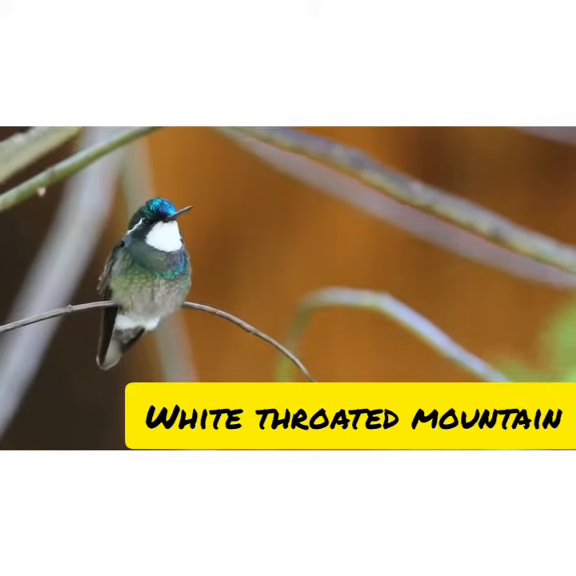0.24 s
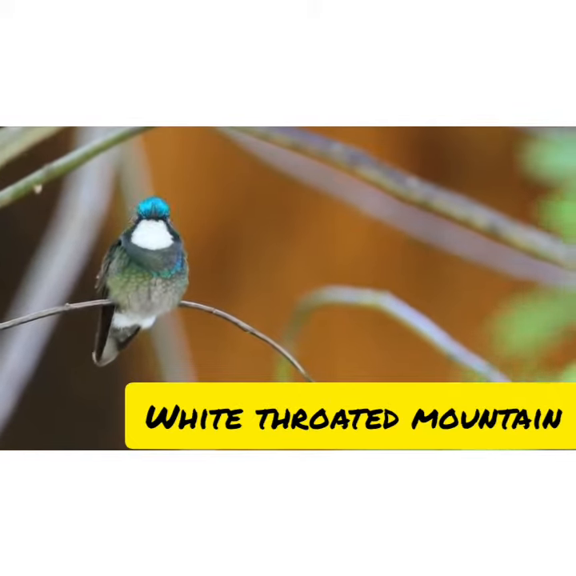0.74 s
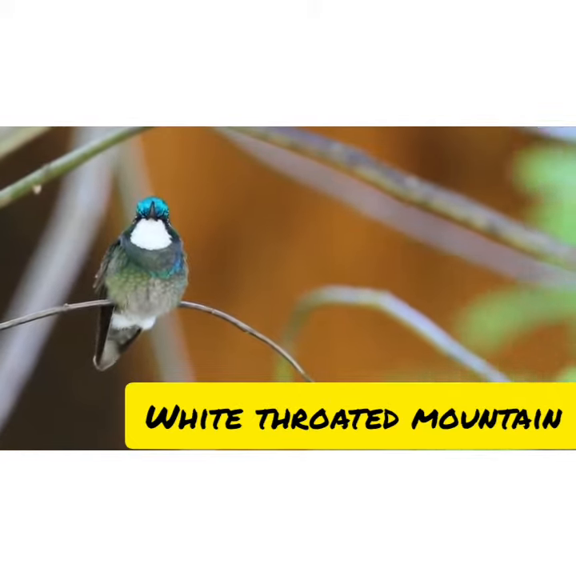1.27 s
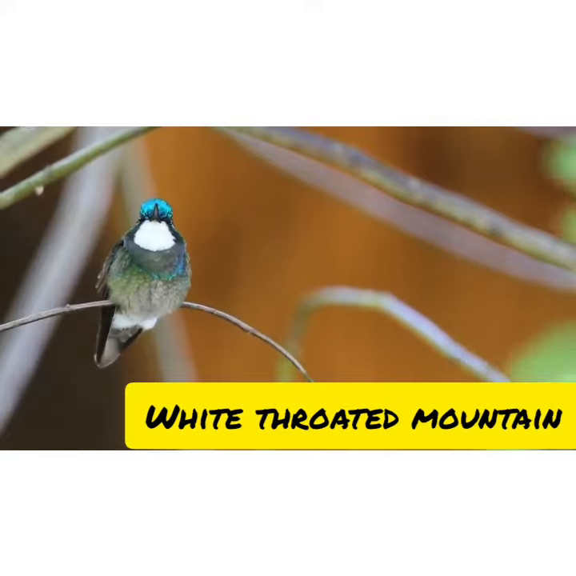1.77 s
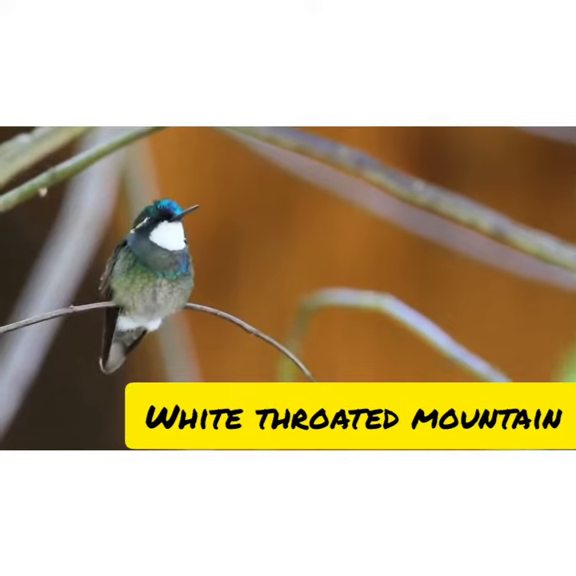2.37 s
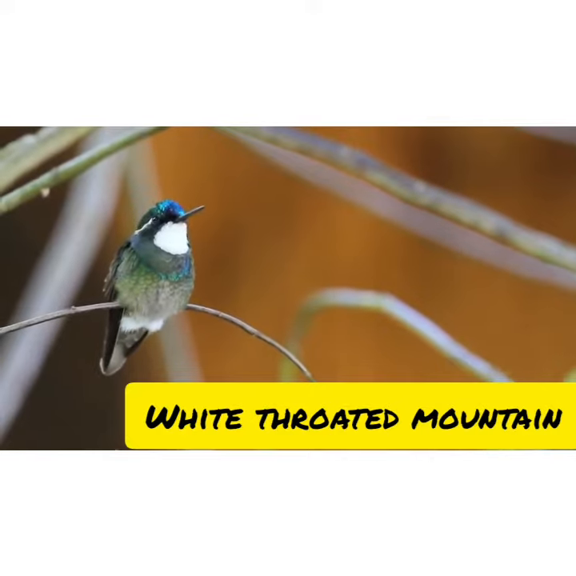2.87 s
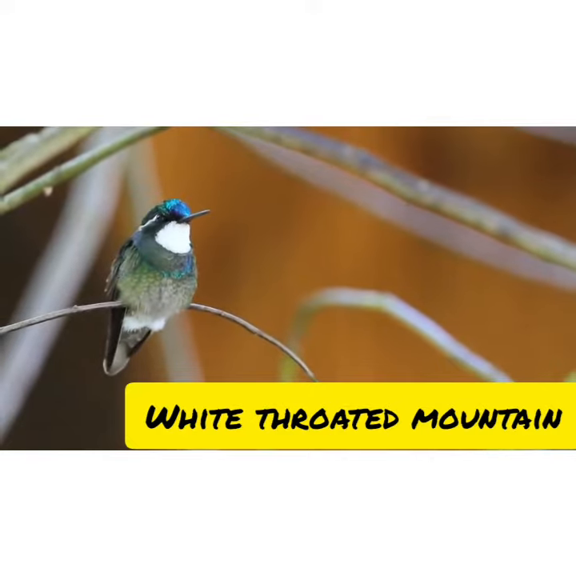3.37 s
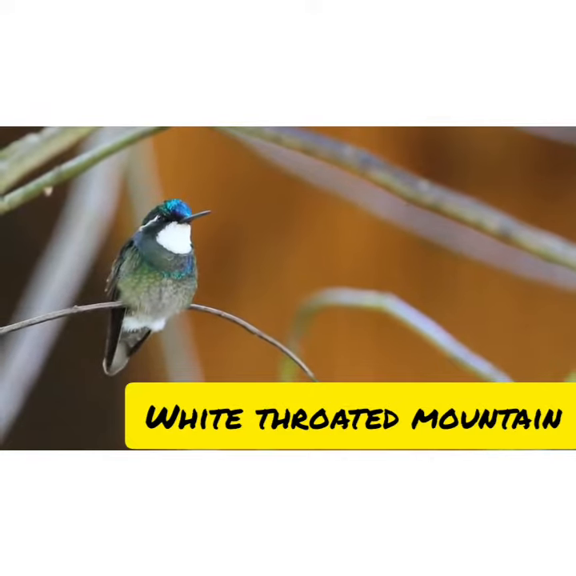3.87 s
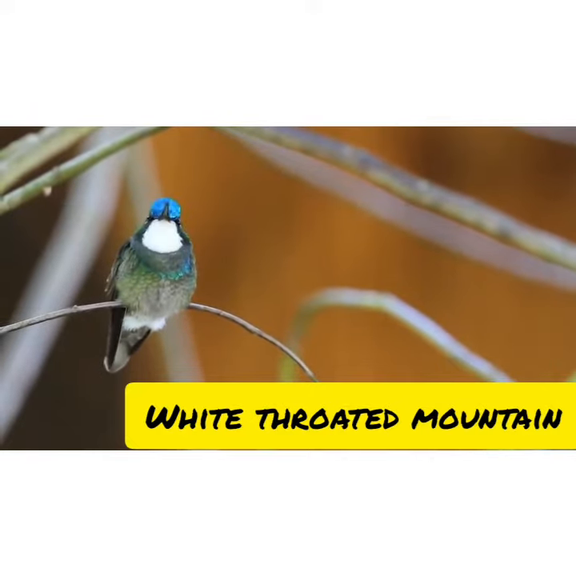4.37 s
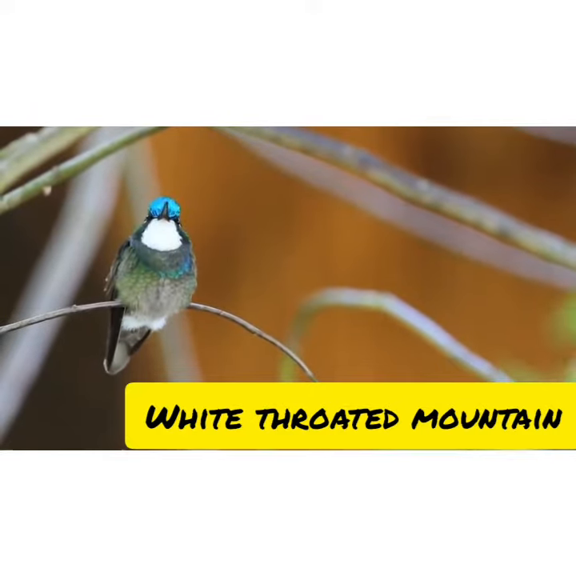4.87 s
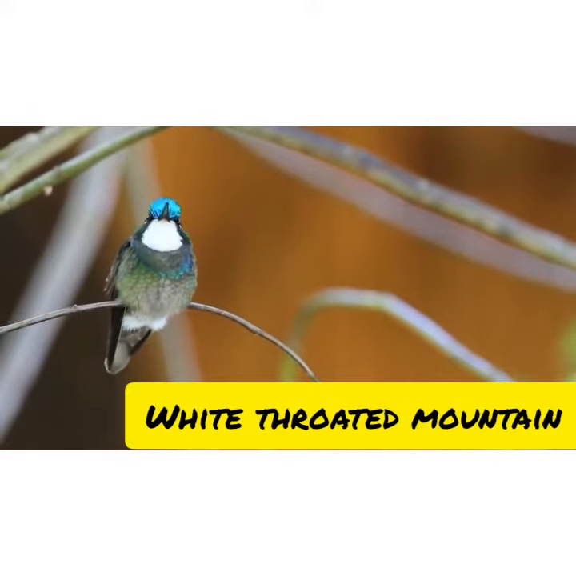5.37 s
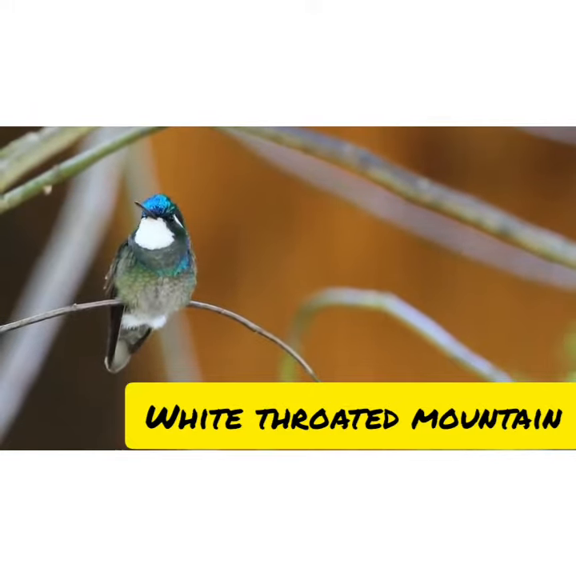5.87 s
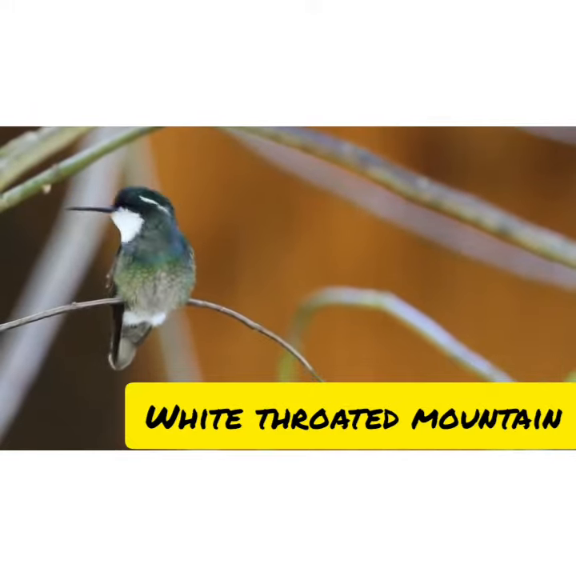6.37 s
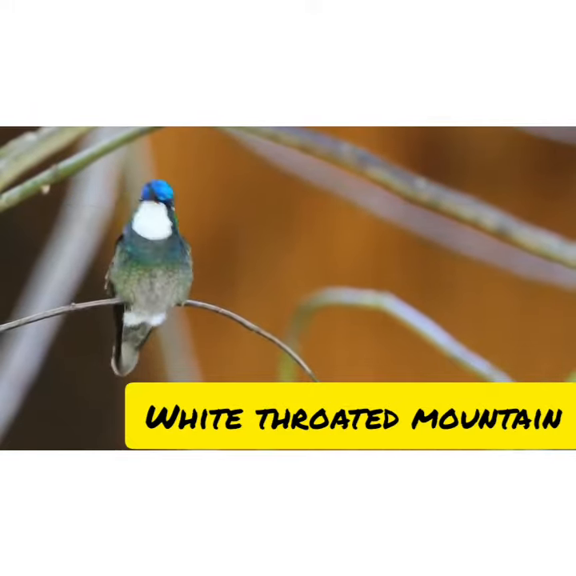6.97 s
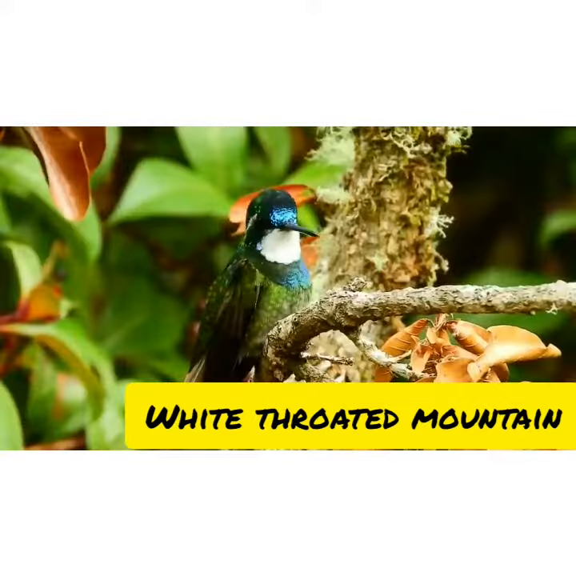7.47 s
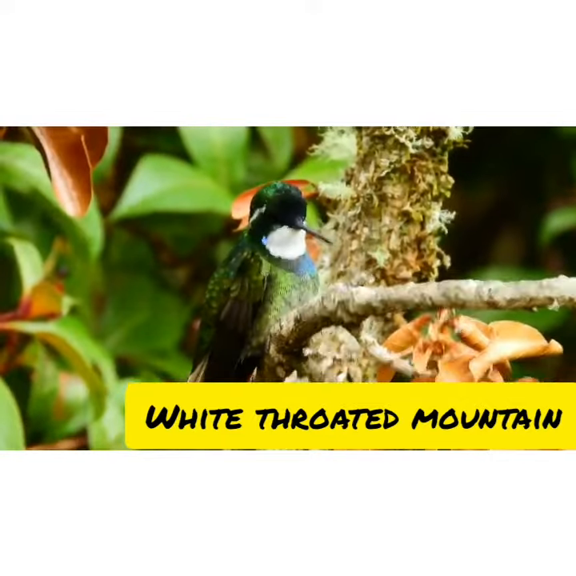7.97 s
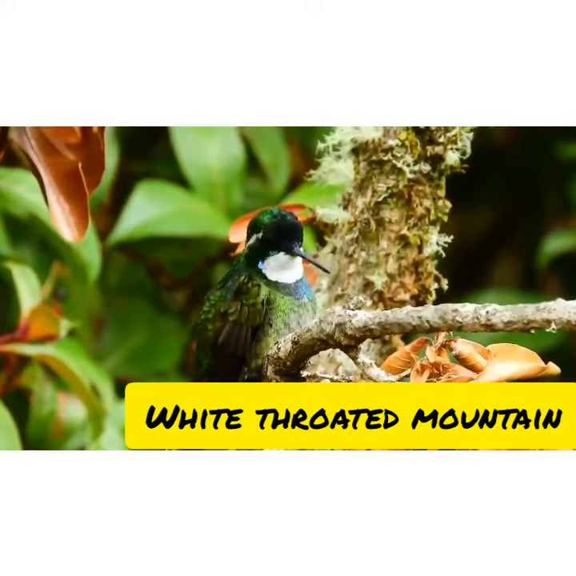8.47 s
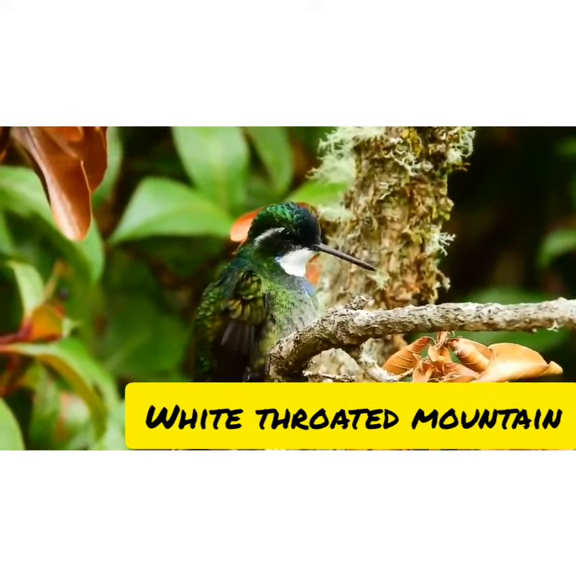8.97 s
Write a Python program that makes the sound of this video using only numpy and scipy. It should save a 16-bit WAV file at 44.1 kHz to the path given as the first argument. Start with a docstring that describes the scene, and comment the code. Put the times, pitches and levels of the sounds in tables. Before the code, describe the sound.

High bird whistles swoop downward among quick bright chirps and chatter in an airy forest; sound cuts briefly, then sparse chirps and ticks continue.

```python
"""Mountain forest with birds, over the hiss of distant water; the sound drops out briefly and resumes at another spot.
Two songbirds whistle long falling slides, a hummingbird near by repeats two quick chirps; others chatter,
squawk, buzz and peep. Voices are gliding sines, some with overtones; water, hum and ticks are filtered noise.
Noise trails echo the voices off leaves and trunks; both channels are alike."""
import sys
import numpy as np
from scipy import signal
from scipy.fft import rfft, irfft
from scipy.io import wavfile
from scipy.ndimage import uniform_filter1d, map_coordinates

SR = 44100
rng = np.random.default_rng(int(sys.argv[2]) if len(sys.argv) > 2 else 0)


def unload_audio(sound):
    """Save the sound as a 16-bit wav file, at the path given as the first command line argument."""
    columns = np.transpose(np.atleast_2d(sound))
    # keep every value between -1 and 1, then stretch to whole-number steps
    steps = np.round(np.clip(columns, -1, 1) * 32767)
    wavfile.write(sys.argv[1], SR, steps.astype(np.int16))


N = 406602   # samples
CHANGE_S = 7.2   # first spot before, second spot after


def from_db(db):
    """Gain of a level in dB."""
    return 10 ** (np.asarray(db) / 20)


def flutter(rate_hz):
    """Smooth chance of spread about one: random knots at rate_hz joined by a cubic spline."""
    knots = int(N / SR * rate_hz)
    return map_coordinates(rng.standard_normal(knots), [np.linspace(0, knots - 1, N)], order=3)


def sing(notes, overtones_db, edge_s=0.0011, round_s=0.001, waver=0.0022, waver_hz=150,
         throat_hz=20000, fickle_db=0.0):
    """Gliding sines with rounded bends, unsteady pitch, overtones that may come and go, and soft edges."""
    out = np.zeros(N)
    unsteady = 1 + waver * flutter(waver_hz)
    overtone_gains = [from_db(db + fickle_db * flutter(59.78)) for db in overtones_db]
    for note in notes:
        point_s, point_hz, point_db = np.transpose(note)
        start_s, end_s = point_s[0], point_s[-1]
        at = np.arange(max(int(start_s * SR), 0), min(int(end_s * SR), N))
        t_s = at / SR
        glide_hz = np.interp(t_s, point_s, point_hz)
        pitch_hz = uniform_filter1d(glide_hz, int(round_s * SR) + 1, mode="nearest") * unsteady[at]
        phase = 2 * np.pi * (np.cumsum(pitch_hz) / SR + rng.random())
        tone = np.sin(phase)
        for k, gain in enumerate(overtone_gains, start=2):
            throat = 1 / (1 + (k * pitch_hz / throat_hz) ** 8)   # mutes the highest overtones
            below_nyquist = k * pitch_hz < SR / 2
            tone += gain[at] * np.sin(k * phase) * throat * below_nyquist
        edges = np.clip(np.minimum(t_s - start_s, end_s - t_s) / edge_s, 0, 1)
        out[at] += np.sqrt(2) * from_db(np.interp(t_s, point_s, point_db)) * edges * tone
    return out


def repeat(shape, events):
    """The same strokes at every event, the pitch a shade different each time."""
    detune = 1 + 0.0054 * rng.standard_normal(len(events))
    notes = []
    for (start_s, level_db), ratio in zip(events, detune):
        for stroke in shape:
            notes.append([(start_s + s, hz * ratio, db + level_db) for s, hz, db in stroke])
    return notes


# Note shapes. Each row: share of the note's length, share of the way from first to last pitch, level in dB.
STEP_DOWN = [(0, .02, -37), (.33, -.14, -9), (.6, -.3, -2), (.7, -0.092, 1.5), (.84, .87, 1.5),
             (1, 1, -3.5)]
HOLD_AND_DROP = [(0, -0.038, -32), (.07, .1, -13.5), (.19, .01, 2), (.39, .11, -3.5), (.5, .1, -27),
                 (.6, .33, -21), (.74, .53, 2.5), (.9, .95, -2.5), (1, 0.99, -12.5)]
HIGH_SLIDE = [(0, 0.038, -43), (.024, .19, -17.5), (.09, 0.37, -5), (.165, 0.57, 4.5), (.235, .675, -0.5),
              (.32, 0.715, -3), (.49, .76, -2), (.645, .865, 4.5), (1, 1, -15)]
SHELF_SLIDE = [(0, 0, -18), (.065, .17, -0.5), (.14, 0.29, -1.5), (.29, 0.28, -4), (.34, 0.31, -6.5),
               (.41, 0.506, -1), (.83, 0.877, 2), (1, 1.01, -14)]
STEEP_SLIDE = [(0, 0.086, -33), (.077, .39, 1), (.167, .567, 0), (.45, .785, 1.5), (.77, 0.95, 4.5),
               (1, 1, -1)]
FALL = [(0, 0.0069, -7), (.1, 0.18, -0.5), (.28, 0.57, 0.3), (.6, .87, 1), (1, 0.99, -6)]
SHORT_CAP = [(0, 0.023, -23), (.3, .2, -20), (.42, 0.283, -10.5), (.72, 0.476, 3), (.79, 0.69, -10),
             (1, 1, -25)]
LONG_SLIDE = [(0, 0.0049, -27.5), (.15, .1, -5.5), (.2, .17, 1), (.35, .5, 4), (.55, .72, -1),
              (.76, .87, -6.5), (1, 1, -21.5)]
STEPPED_FALL = [(0, 0.067, -13), (.1, 0.011, -5), (.32, .32, 3), (.5, 0.36, 2), (.76, .95, 0), (1, 1, -4)]
SNAP_FALL = [(0, 0.022, -14), (.08, 0.11, -15), (.11, 0.24, 6), (.15, 0.26, -11.5), (.45, .75, -10),
             (1, 1, -15.5)]
SWELL = [(0, 0.011, -10), (.48, 0.5, 4), (1, 1, -6)]
GLIDE = [(0, 0.065, 0.5), (1, 0.97, 3.5)]
SCOOP_HOLD_FLICK = [(0, -.6, -13), (.13, .12, 3.5), (.3, 0.12, 5), (.45, 0.04, 2), (.8, .02, 3),
                    (1, 1, 2.5)]
KICKED_HOLD = [(0, -.4, -12), (.17, .06, 3), (.27, .3, 0), (.36, 0, -0.5), (.8, 0, 2), (1, 0.9, -6)]
LATE_KICK = [(0, -.3, -5.5), (.5, 0.091, 1.5), (.57, .45, -1), (.65, 0, -2), (.83, .03, 1), (1, 1, 3)]
WARBLED_FALL = [(0, 0.058, -6.5), (.13, 0.098, -6), (.24, .42, 5), (.33, 0.29, 3), (.43, .56, 2),
                (.57, 0.61, 4), (1, 0.97, -7)]
ARCH = [(0, 0.0084, -12), (.2, -.3, 0), (.42, -.65, -0.5), (.65, -.2, -1), (1, 1, -7)]
UPSWING = [(0, 0.046, -6), (.65, 0.4, 3), (1, 1, -4)]
HUMPED_NOTE = [(0, -.6, -8.5), (.14, 1.05, 3), (.42, 0.86, 2.5), (.52, .25, 2.5), (.7, -.03, 0),
               (.89, 0.028, 0), (1, 1.07, -7)]


def lay_out(song):
    """Stretch each shape to its notes' length and pitch range: (s, Hz, dB) points.

    Each song row: shape, notes. Each note: start in s, length in s, first Hz, last Hz, level in dB."""
    laid = []
    for shape, notes in song:
        for start_s, length_s, first_hz, last_hz, level_db in notes:
            laid.append(sorted((start_s + length_s * share, first_hz + (last_hz - first_hz) * way, db + level_db)
                               for share, way, db in shape))
    return laid


def forest(x, near_db, near_t60, far_db, far_t60=0.51):
    """Direct sound plus scatter off near leaves and far trunks: two dying noises, T60 in seconds."""
    t_s = np.arange(SR) / SR
    trail = np.zeros(SR)
    for db, t60_s in ((near_db, near_t60), (far_db, far_t60)):
        echoes = rng.standard_normal(SR) * from_db(-60 * t_s / t60_s)
        trail += from_db(db) * echoes / np.sqrt(np.sum(echoes ** 2))
    trail[0] = 1   # direct sound
    before = np.arange(N) < CHANGE_S * SR
    first = signal.fftconvolve(x * before, trail)[:N] * before   # echoes end with the first spot
    second = signal.fftconvolve(x * ~before, trail)[:N]
    return first + second


# Water colour. Each row: frequency in Hz, relative density in dB at the first spot, at the second spot.
HISS_COLOURS = [(30, -27, -27), (90, -40.5, -37), (218, -37, -33), (291.5, -23.5, -25.5), (471.4, -1, -1.5),
                (600, -5.5, -2.5), (1175, -7.5, -2), (2300, -16, -8.5), (4400, -19, -17.5),
                (8040, -23, -24.5), (15300, -27.5, -29)]
FIRST_HISS_DB, SECOND_HISS_DB = -44, -51.5   # RMS before swell and drop-out gain


def water_hiss():
    """Far water: smooth noise, coloured differently at the two spots, swelling a little."""
    knot_hz, first_db, second_db = np.transpose(HISS_COLOURS)
    bins_hz = np.maximum(np.fft.rfftfreq(N, 1 / SR), 1)
    white = rfft(rng.standard_normal(N))

    def colour(density_db):
        return irfft(white * from_db(np.interp(np.log(bins_hz), np.log(knot_hz), density_db)), N)

    first, second = colour(first_db), colour(second_db)
    both = np.where(np.arange(N) < CHANGE_S * SR,
                    from_db(FIRST_HISS_DB) * first / first.std(),
                    from_db(SECOND_HISS_DB) * second / second.std())
    swell = np.interp(np.arange(N), np.linspace(0, N, 40), rng.standard_normal(40))
    return both * from_db(0.33 * swell)


HUM_S, HUM_HZ, HUM_DB = 6.54, 478, -44   # dB: RMS before swell and drop-out gain


def low_hum():
    """A soft, narrow rush of low noise that swells once, briefly."""
    band = signal.butter(2, [0.88 * HUM_HZ, HUM_HZ / 0.91], "band", fs=SR, output="sos")
    rush = signal.sosfilt(band, rng.standard_normal(N))
    swell = np.exp(-((np.arange(N) / SR - HUM_S) / 0.082) ** 2)
    return from_db(HUM_DB) * rush / rush.std() * swell


# Faint, nearly level held notes at several pitches, far off. Song rows as in lay_out.
STEADY_NOTES = [(SWELL, [(5.41, .2, 2505, 2490, -48), (5.545, .12, 2860, 2870, -55),
                (5.585, .09, 2150, 2140, -54), (5.76, .14, 2870, 2830, -57),
                (5.82, 0.085, 2100, 2100, -55.5)])]


def steady_notes():
    """A far bird's held notes: plain sines."""
    return sing(lay_out(STEADY_NOTES), [])


# Short thin falls and peeps, far off. Song rows as in lay_out.
THIN_NOTES = [(FALL, [(1.403, 0.036, 11600, 7830, -31)]), (SWELL, [(5.491, 0.027, 10650, 6850, -27),
              (1.843, 0.018, 6950, 6930, -39), (1.843, 0.017, 8250, 8650, -48)]),
              (GLIDE, [(5.493, 0.021, 11800, 8920, -41)]), (SNAP_FALL, [(7.23, 0.031, 6210, 3630, -26.5)])]


def thin_notes():
    """Short, high plain sines."""
    return sing(lay_out(THIN_NOTES), [], edge_s=0.0013)


# Far chatter strokes. Each row: seconds from start, pitch in Hz, level in dB.
FAR_CHATTER_SHAPE = [
    [(0, 3180, 5.5), (.018, 2620, 2), (.048, 2890, 0)],
]
# Each row: start in seconds, level in dB.
FAR_CHATTER_EVENTS = [(0, -50.5), (.152, -54), (.268, -54.5), (0.377, -52), (.495, -54)]


def far_chatter():
    """Chatter from far off: wavering sines without overtones."""
    return sing(repeat(FAR_CHATTER_SHAPE, FAR_CHATTER_EVENTS), [], waver=0.022)


# Soft low whistles. Song rows as in lay_out.
WHISTLE_NOTES = [(HUMPED_NOTE, [(3.018, 0.069, 2420, 3530, -38)]),
                 (SCOOP_HOLD_FLICK, [(3.17, .048, 2220, 2650, -43)]),
                 (WARBLED_FALL, [(3.4, 0.064, 4760, 2760, -36)]),
                 (STEPPED_FALL, [(6.45, .13, 3990, 2500, -40.5)]), (FALL, [(6.822, 0.056, 2200, 3080, -50),
                 (.643, .035, 3250, 2150, -55)])]


def whistles():
    """Wavering sines with a weak second harmonic."""
    return sing(lay_out(WHISTLE_NOTES), [-23], round_s=0.003, waver=0.014, throat_hz=7860)


# Harsh buzzes. Song rows as in lay_out.
BUZZ_NOTES = [(GLIDE, [(1.322, .063, 751, 1270, -42.5), (1.515, 0.037, 855, 880, -45.5)]),
              (UPSWING, [(3.382, .019, 893, 2060, -43)])]
# Overtones 2, 3, ..: mean level in dB against the fundamental, before throat and high-pass.
BUZZ_OVERTONES_DB = [2, -0.5, -1, 0.5, -5, -6, -7]


def buzzes():
    """Low, rough pitch with strong overtones; a small throat sends out little bass."""
    voice = sing(lay_out(BUZZ_NOTES), BUZZ_OVERTONES_DB, waver=0.025, waver_hz=401,
                 throat_hz=7500, fickle_db=1.5)
    return signal.sosfilt(signal.butter(2, 950.0, "high", fs=SR, output="sos"), voice)


# Squawk strokes, arched in pitch. Each row: seconds from start, pitch in Hz, level in dB.
SQUAWK_SHAPE = [
    [(0, 1870, -16), (.007, 1273, 5), (.017, 1355, 2), (.026, 1250, -2), (.038, 837, -2)],
]
# Each row: start in seconds, level of the weak fundamental in dB.
SQUAWK_EVENTS = [(1.866, -60), (2.407, -62.5)]
# Squawks that start low and arch over. Song rows as in lay_out, level of the weak fundamental.
ARCHED_SQUAWKS = [(ARCH, [(1.62, .037, 1127, 807, -59), (2.709, .029, 1293, 986, -76.5)])]
# Overtones 2, 3, ..: mean level in dB against the fundamental, before the throat.
SQUAWK_OVERTONES_DB = [4, 26.5, 30.5, 20.5, 24.8, 18.3]


def squawks():
    """A weak fundamental under much stronger overtones, rough in pitch."""
    return sing(repeat(SQUAWK_SHAPE, SQUAWK_EVENTS) + lay_out(ARCHED_SQUAWKS), SQUAWK_OVERTONES_DB,
                round_s=0.0036, waver=0.013, waver_hz=400, fickle_db=2.5)


# High peep stroke. Each row: seconds from start, pitch in Hz, level in dB.
PEEP_SHAPE = [
    [(.004, 10050, -23), (.013, 8650, 0.5), (.017, 9300, 2.5), (.024, 9300, -20)],
]
# Each row: start in seconds, level in dB.
PEEP_EVENTS = [(7.556, -44), (7.9597, -32), (8.606, -39.5), (9.1757, -36.5)]


def peeps():
    """High plain sines: pitch dips, then rises."""
    return sing(repeat(PEEP_SHAPE, PEEP_EVENTS), [])


# Dry ticks. Each row: start in seconds, burst level in dB before the band-pass.
TICK_EVENTS = [(8.2337, -35), (8.2358, -37), (8.238, -35), (8.2883, -34), (8.3243, -41), (8.73, -38.5)]


def ticks():
    """Tiny bursts of bright noise, about a millisecond long."""
    clicks = np.zeros(N)
    decay = np.exp(-np.arange(200) / (0.00078 * SR))
    for start_s, level_db in TICK_EVENTS:
        at = int(start_s * SR)
        clicks[at:at + 200] += from_db(level_db) * rng.standard_normal(200) * decay
    return signal.sosfilt(signal.butter(2, [6000, 13000], "band", fs=SR, output="sos"), clicks)


# Chattering bird. Song rows as in lay_out.
CHATTER_NOTES = [(HUMPED_NOTE, [(1.068, 0.084, 2556, 3400, -35.5)]),
                 (SCOOP_HOLD_FLICK, [(1.188, 0.065, 2646, 3590, -37), (1.296, .064, 2606, 3370, -36),
                 (1.66, 0.066, 2616, 3620, -37.5)]), (LATE_KICK, [(1.418, .077, 2694, 3590, -32)]),
                 (KICKED_HOLD, [(1.538, 0.076, 2637, 3760, -34.5)])]
# Overtones 2, 3, ..: mean level in dB against the fundamental, before the throat.
CHATTER_OVERTONES_DB = [-11.5, 1.7, -4]


def chatter():
    """Rough pitch, rich in overtones that come and go."""
    return sing(lay_out(CHATTER_NOTES), CHATTER_OVERTONES_DB, round_s=0.003, waver=0.017, waver_hz=300.2,
                throat_hz=8280, fickle_db=3.0)


# Hummingbird chirps, stroke by stroke. Each row: seconds from start, pitch in Hz, level in dB.
RISING_SHAPE = [
    [(.004, 8800, -15), (.0058, 6260, -2), (.007, 4300, -17)],
    [(.008, 5700, -18), (.0095, 5030, -4), (.013, 4780, -22)],
    [(.0185, 7500, -8), (.020, 4270, -11), (.031, 5960, 6), (.039, 7140, -2.5), (.040, 7550, -3),
     (.046, 9050, -16.5)],
]
HOOKED_SHAPE = [
    [(.003, 10840, -8), (.006, 7360, 3), (.009, 5740, -3), (.012, 5080, -18)],
    [(.0155, 10400, -7.5), (.018, 6960, 3), (.023, 6500, 2.5), (.033, 7170, 5), (.034, 7670, 1),
     (.045, 8930, -14.5)],
]
# Each row: start in seconds, level in dB.
RISING_EVENTS = [(0.0069, -31.5), (0.8707, -33.5), (1.72, -33), (2.62, -31), (3.485, -32), (4.3479, -33),
                 (5.195, -31.5), (6.0023, -31), (6.854, -32), (7.6014, -39.5), (8.4654, -39)]
HOOKED_EVENTS = [(0.424, -33.5), (1.294, -35.5), (2.1567, -30), (3.033, -31.5), (3.8928, -32),
                 (4.757, -30.5), (5.5907, -31.5), (6.4183, -34), (8.0237, -40), (8.8664, -39.5)]
# Overtone 2: level in dB against the fundamental, before the throat.
CHIRP_OVERTONES_DB = [-20]


def hummingbird_chirps():
    """Rising and hooked chirps: fast sweeps with very short edges."""
    strokes = repeat(RISING_SHAPE, RISING_EVENTS) + repeat(HOOKED_SHAPE, HOOKED_EVENTS)
    return sing(strokes, CHIRP_OVERTONES_DB, edge_s=0.00019, throat_hz=13500)


# Softer songbird. Song rows as in lay_out.
SOFT_SONG = [(FALL, [(.085, .22, 6150, 3590, -39), (6.425, .21, 6180, 3717, -28.5)]),
             (SHELF_SLIDE, [(.395, 0.47, 6503, 2926, -31), (6.722, 0.46, 6600, 2990, -26)]),
             (SWELL, [(6.098, 0.038, 5210, 4760, -35.5), (6.256, 0.067, 5580, 4830, -31.5)])]


def soft_slides():
    """Plain sine slides with well rounded bends."""
    return sing(lay_out(SOFT_SONG), [], round_s=0.027)


# Upward flick that opens a slide. Each row: seconds from start, pitch in Hz, level in dB.
FLICK_SHAPE = [
    [(0, 3140, -14), (.005, 6800, -2.5), (.011, 7640, 4.5)],
]
# Each row: start in seconds, level in dB.
FLICK_EVENTS = [(1.492, -22), (4.434, -18.5)]
# Loud songbird: one phrase twice, plus a single steep slide. Song rows as in lay_out.
LOUD_SONG = [(STEP_DOWN, [(.96, 0.19, 4963, 3865, -22), (3.91, 0.17, 4927, 3775, -24.5)]),
             (HOLD_AND_DROP, [(1.25, 0.194, 4020, 2776, -21), (4.195, 0.19, 3910, 2770, -19)]),
             (SHORT_CAP, [(1.525, 0.092, 6040, 4980, -15), (4.47, 0.082, 5900, 5130, -18.5)]),
             (LONG_SLIDE, [(1.6, 0.36, 5130, 2687, -15.5), (4.55, 0.35, 5033, 2680, -18)]),
             (HIGH_SLIDE, [(2.043, 0.46, 8860, 2975, -18.5), (4.981, 0.45, 8880, 3095, -20)]),
             (STEEP_SLIDE, [(.955, .39, 9040, 3470, -32.5)])]
# Overtone 2: level in dB against the fundamental, before the throat.
SLIDE_OVERTONES_DB = [-38.5]


def loud_slides():
    """Long, nearly pure falling whistles, with quick upward flicks."""
    slides = sing(lay_out(LOUD_SONG), SLIDE_OVERTONES_DB, round_s=0.017, waver=0.0027, throat_hz=9000)
    return slides + sing(repeat(FLICK_SHAPE, FLICK_EVENTS), [])


def scene():
    """All voices, each with its echo trail, heard alike on both sides."""
    hoarse = 1 + 0.17 * flutter(2500)   # harsh voices tremble fast in strength
    come_and_go = from_db(2.5 * flutter(60.0))
    far_notes = (whistles() + steady_notes()) * come_and_go
    thin = thin_notes()
    later = np.arange(N) > CHANGE_S * SR   # thin notes at the second spot carry more echo
    mono = (water_hiss() + low_hum()
            + forest(thin * ~later, near_db=-0.5, near_t60=0.11, far_db=-18.0)
            + forest(thin * later, near_db=1.0, near_t60=0.19, far_db=-12.0)
            + forest(far_chatter() + buzzes() + hoarse * squawks(), near_db=-4.0, near_t60=0.089, far_db=-10.5)
            + forest(peeps(), near_db=-5.0, near_t60=0.11, far_db=-28)
            + forest(hoarse * chatter(), near_db=-5.5, near_t60=0.091, far_db=-11.5)
            + forest(hummingbird_chirps() + ticks() + far_notes, near_db=-10.5, near_t60=0.047, far_db=-40.5)
            + forest(soft_slides(), near_db=-8.0, near_t60=0.043, far_db=-11.5)
            + forest(loud_slides(), near_db=-4.5, near_t60=0.12, far_db=-12.5))
    return np.array([mono, mono])


# Gain around the drop-out; the end values hold outside it. Each row: time in seconds, gain in dB.
DROP_OUT = [(7.162, -5), (7.164, -24), (7.203, -50), (7.21, -21), (7.23, -5), (7.231, 4)]
CUTOFF_HZ = 15750   # 60 dB down from here up


def record(dry):
    """The sound drops out for a moment and returns at a higher gain; a steep low-pass cuts the top."""
    point_s, point_db = np.transpose(DROP_OUT)
    gain = from_db(np.interp(np.arange(N) / SR, point_s, point_db))
    low_pass = signal.cheby2(16, 60, CUTOFF_HZ, fs=SR, output="sos")
    return signal.sosfilt(low_pass, dry * gain)


dry = scene()
out = record(dry)
unload_audio(out)
```